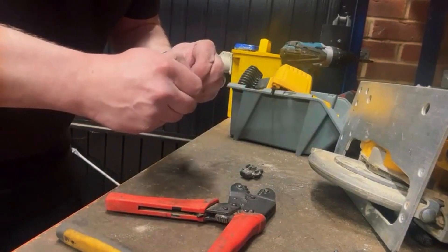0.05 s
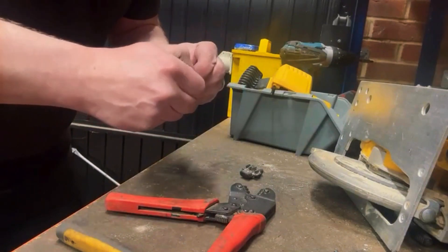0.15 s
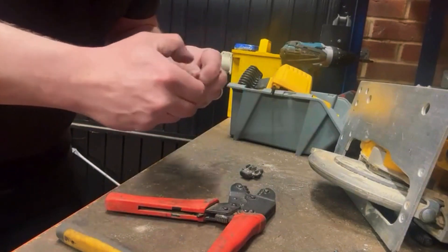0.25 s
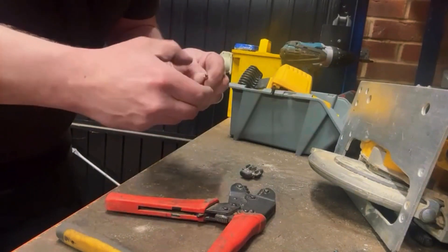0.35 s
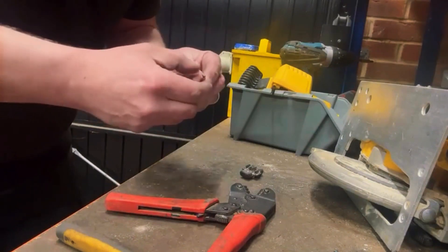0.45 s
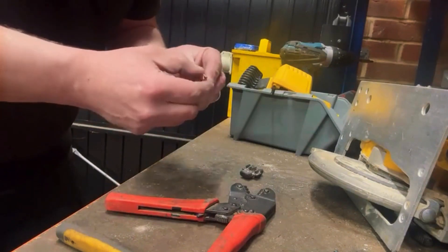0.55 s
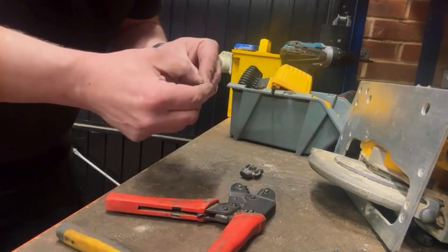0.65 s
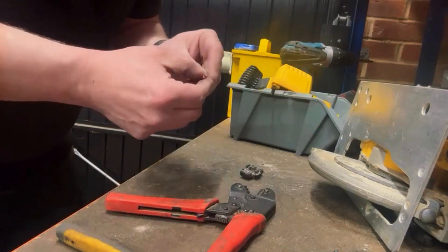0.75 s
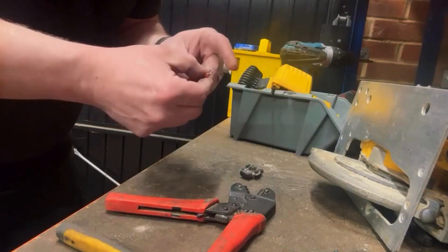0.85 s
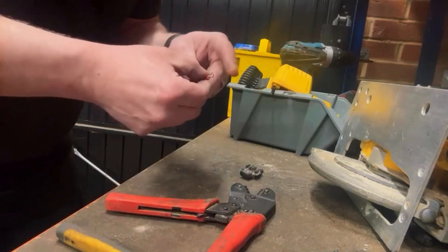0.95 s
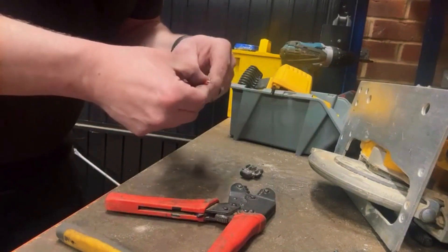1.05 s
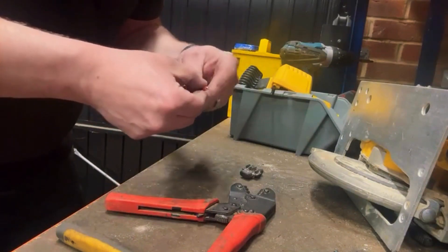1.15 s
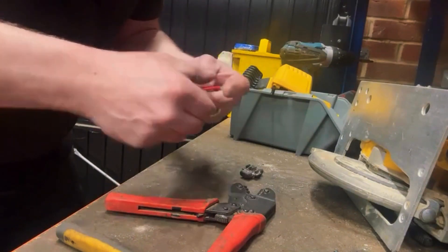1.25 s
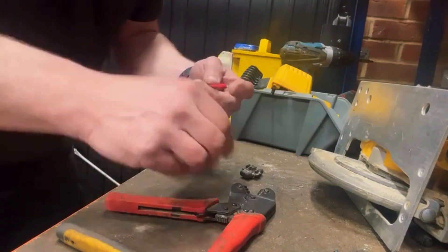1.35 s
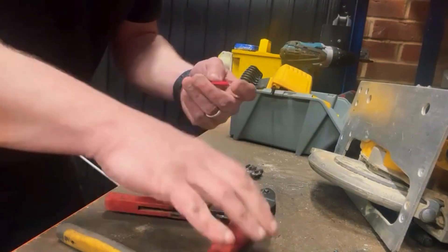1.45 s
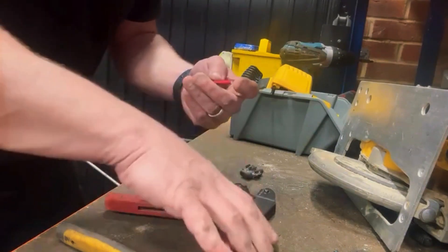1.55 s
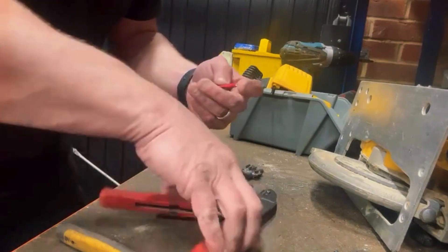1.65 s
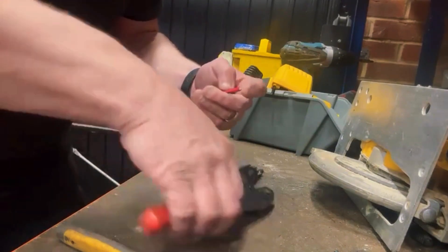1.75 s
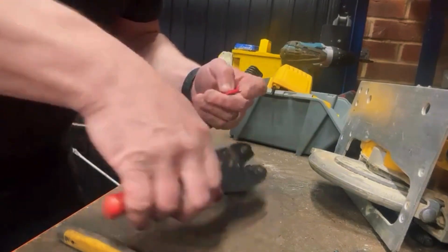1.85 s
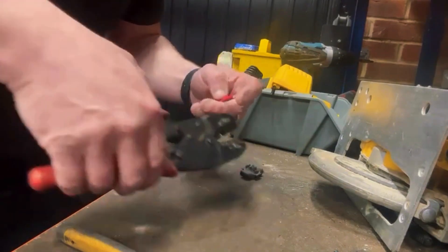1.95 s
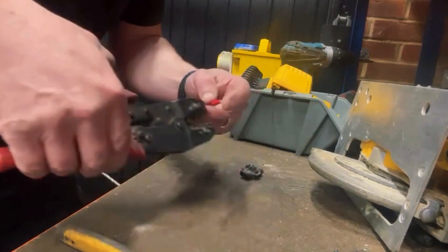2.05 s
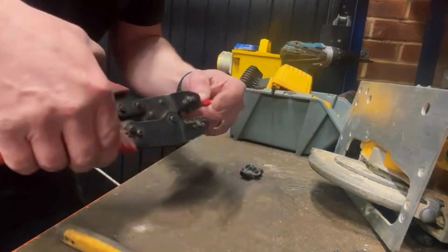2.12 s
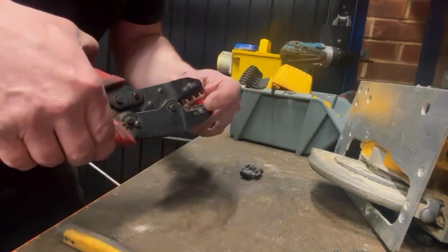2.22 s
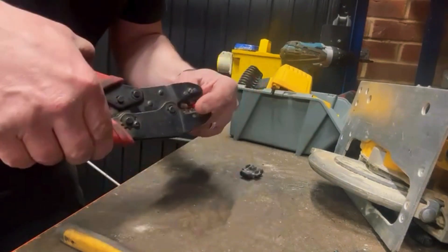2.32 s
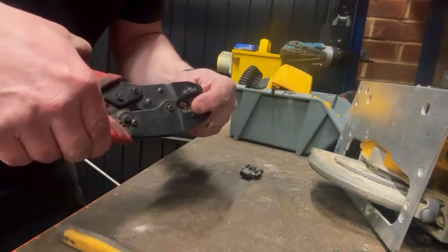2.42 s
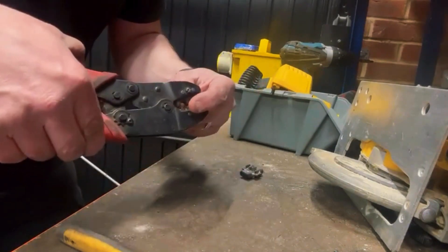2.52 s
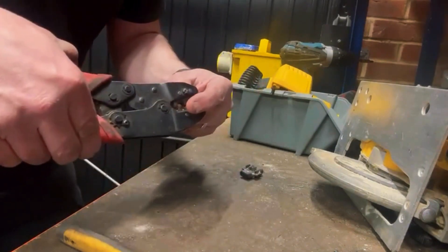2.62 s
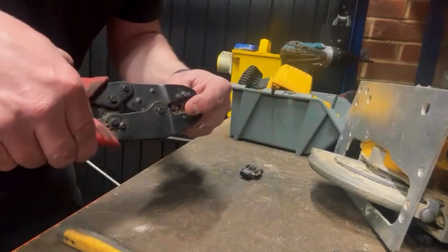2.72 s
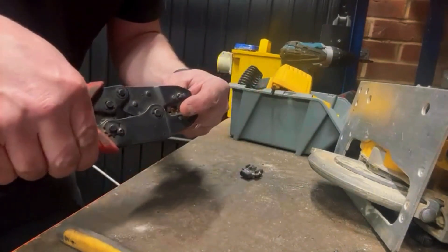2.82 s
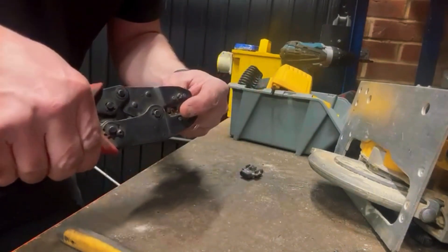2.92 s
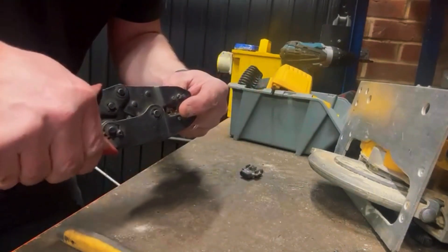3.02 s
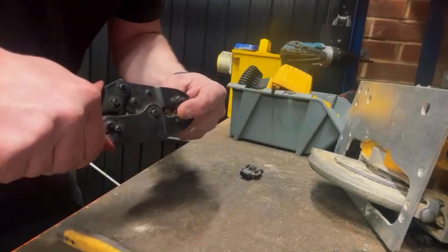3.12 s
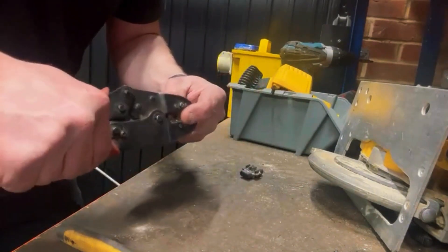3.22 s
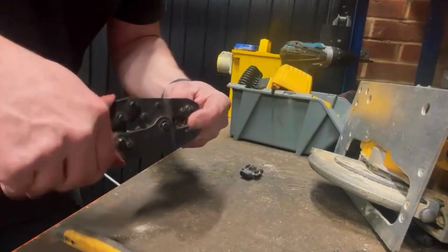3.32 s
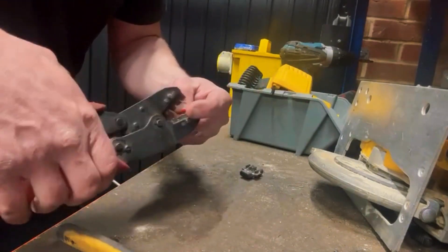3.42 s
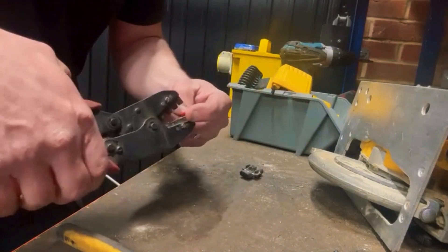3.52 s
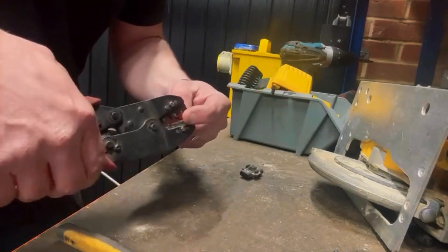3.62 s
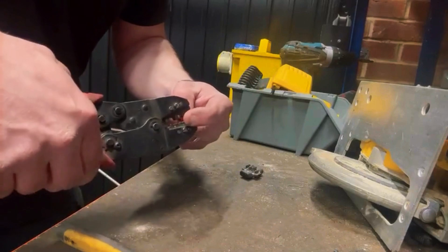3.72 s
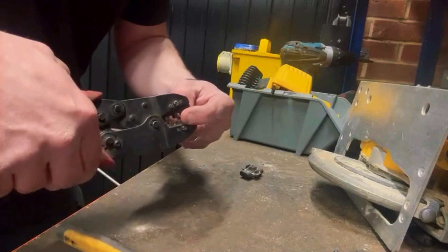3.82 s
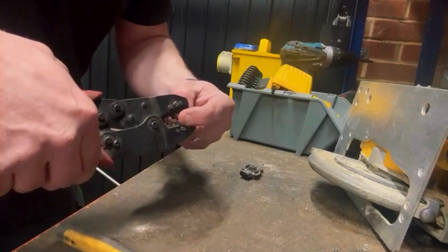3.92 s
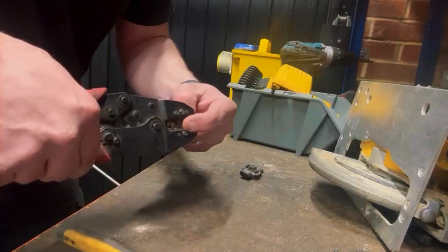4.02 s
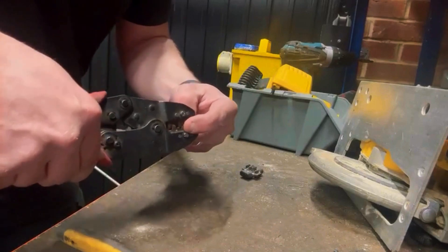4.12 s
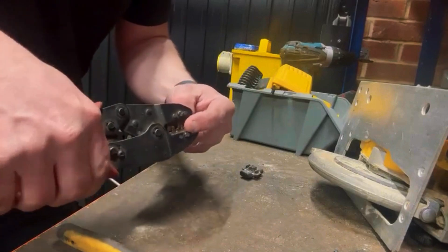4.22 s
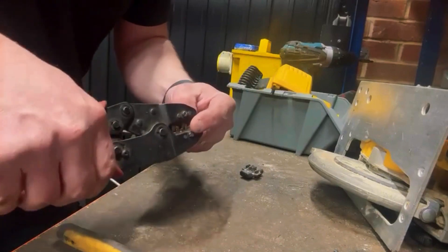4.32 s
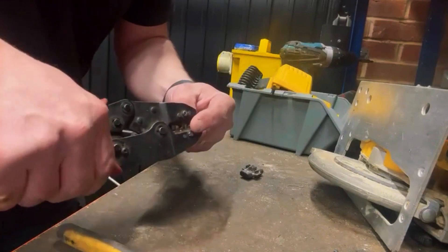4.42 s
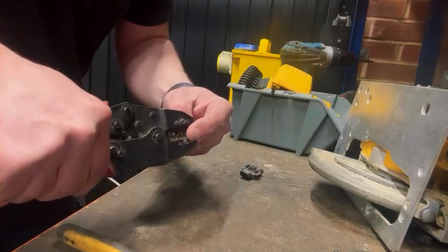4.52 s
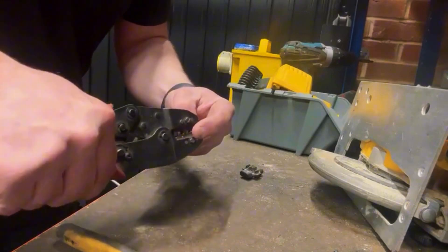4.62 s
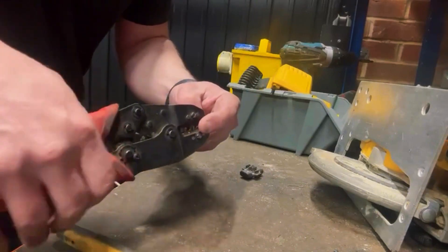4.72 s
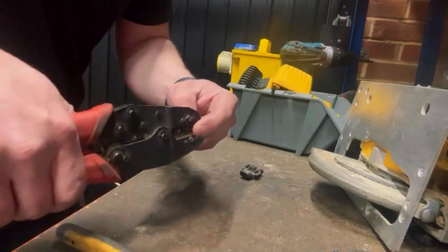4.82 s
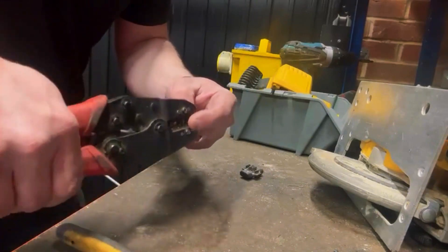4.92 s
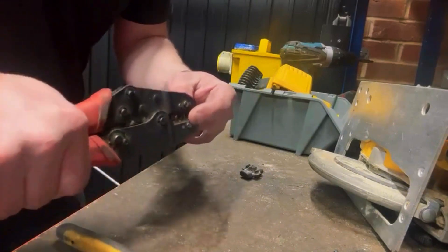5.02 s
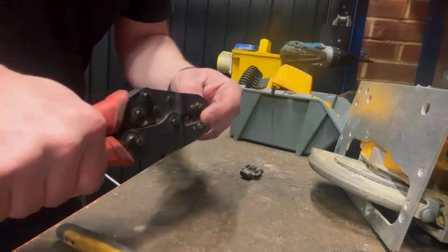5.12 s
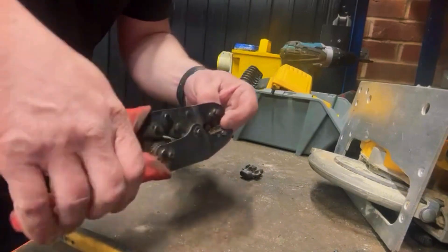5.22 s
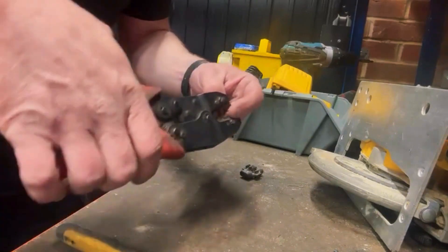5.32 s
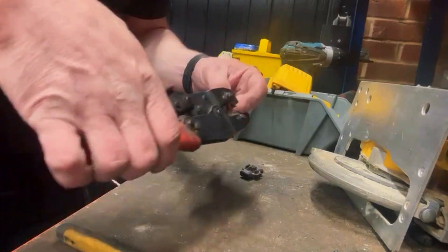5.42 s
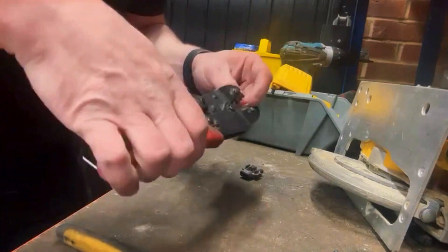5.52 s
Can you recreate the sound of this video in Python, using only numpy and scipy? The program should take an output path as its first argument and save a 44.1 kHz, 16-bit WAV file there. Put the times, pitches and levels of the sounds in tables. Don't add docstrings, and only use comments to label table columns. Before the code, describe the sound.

Close stereo pickup of a hand tool at a workbench, leaning right. Low rumble and soft hiss first, then a woody clatter and drag as the tool is lifted. Loud, dry steel ratchet clicks follow in irregular bursts with gaps between, including a rapid purring release, jaws shutting, faint spring ringing and a small skin rub on rubber at the end.

```python
import sys
import numpy as np
from scipy import signal
from scipy.fft import rfft, irfft, next_fast_len
from scipy.io import wavfile
from scipy.ndimage import uniform_filter1d

SR = 44100
rng = np.random.default_rng(int(sys.argv[2]) if len(sys.argv) > 2 else 0)


def transcribe(signal):
    frames = np.atleast_2d(signal).T
    limited = np.clip(frames, -1, 1)
    pcm = np.round(limited * 32767).astype(np.int16)
    wavfile.write(sys.argv[1], SR, pcm)


def volts_from_decibels(level):
    exponent = np.asarray(level, float) / 20
    return 10 ** exponent


N = 245004

# (time [s], peak [dB], treble over peak [dB], tooth tone [Hz], time for chatter to die by 60 dB [s])
TOOTH_SNAPS = [(2.595, -7.5, -14, 4084, .025), (2.6625, -7, -12, 4200, 0.019),
               (2.6981, -7.5, -13.5, 6780, 0.032), (2.8905, -15.5, -4, 5970, 0.023),
               (2.9645, -11, -6, 4370, .019), (3.0057, -13, -3, 4300, 0.039),
               (3.042, -10.5, -3, 4900, 0.046), (3.0778, -7, -7.5, 4120, .042),
               (3.9304, -8.5, -9.5, 3790, 0.032), (3.9465, -7.5, -11, 3920, .038),
               (3.9653, -4, -16.5, 4005, 0.03), (3.978, -9, -6, 3020, 0.021),
               (4.3175, -8.5, -11, 4510, 0.029), (4.4033, -13.5, -2, 6710, 0.027),
               (4.9408, -6, -6.5, 6850, 0.024), (5.1381, -19.5, -6.5, 5960, 0.05),
               (5.201, -7.5, -0.5, 6480, .018), (5.2172, -6.5, -5, 5670, .016),
               (5.271, -11.5, -7, 5840, 0.048), (5.298, -9, -8, 4300, .043),
               (5.3167, -12.5, -5.5, 2980, 0.062), (5.3402, -7.5, -10.5, 5940, 0.022),
               (5.4398, -5.5, -9.5, 6000, 0.031)]
# (time [s], peak [dB], treble over peak [dB], tone [Hz])
SLACK_TICKS = [(1.511, -45.5, -11, 3000), (1.6732, -34.5, -13, 5000), (1.7081, -34.5, -8, 5640),
               (2.161, -51.5, -41, 3020), (2.2375, -62, -28, 3280), (2.2948, -45, -4.5, 6500),
               (2.3424, -59, -7, 4160), (2.4538, -47.5, -17, 4500), (2.571, -49, -47, 5250),
               (2.6475, -35.5, 6.5, 4280), (3.2652, -30.5, -7.5, 5920), (3.314, -32.5, -18.5, 5310),
               (3.5923, -41, -14.5, 6320), (3.919, -37.5, -40, 3180), (4.2011, -35, -10.5, 4350),
               (4.2884, -45.5, -10.5, 5980), (4.6088, -46.5, -18, 3170), (4.6566, -52, 2, 5800),
               (5.5345, -27.5, -2, 3450)]
# (time [s], peak [dB], treble over peak [dB], clap over peak [dB])
JAW_CLAPS = [
    (3.0982, -16, -33, -10),
    (3.3023, -44, 0, -12),
    (3.991, -30, -1.5, -13.5),
    (4.9726, -7.5, -4.5, -23.5),
    (4.9794, -15.5, -1, -10),
    (5.0935, -33.5, -8, -5),
]
# (time [s], peak [dB], tooth tone [Hz])
RELEASE_RATTLE = [
    (3.3288, -7, 5650),
    (3.3348, -7.5, 3520),
    (3.342, -7, 4400),
    (3.3466, -7, 4220),
    (3.3543, -8, 3360),
    (3.3639, -11, 4000),
    (3.3714, -10, 4750),
    (3.375, -8, 4670),
    (3.3782, -25.5, 5300),
    (3.384, -23.5, 5300),
]
# (tone [Hz], level [dB], time to die by 60 dB [s])
STEEL_TONES = [(1456, -11, 0.078), (2136, -7, 0.054), (3170, -35.5, 0.046), (3386, 16, 0.0053),
               (3920, 11, 0.0098), (4120, -12, 0.14), (4426, -13.5, 0.1), (5050, -10.5, .05),
               (5300, -19.5, 0.065), (5824, -9.5, 0.013), (6000, -1.5, 0.084), (6357, 3, 0.058),
               (9030, -11, 0.025), (9675, -6.5, 0.024)]
# (pitch [Hz], level [dB])
JAW_COLOUR = [(100, -46.5), (250, -12), (450, -1), (800, -7), (1150, 3.5), (1600, 1), (2600, -1.5),
              (4000, -38)]
# (pitch [Hz], level [dB])
CRACK_COLOUR = [(300, -46), (800, -31), (1400, -16), (1750, -19.5), (2600, -16.5), (3200, -3.5),
                (3900, -4.5), (4700, -5.5), (6000, -3.5), (6700, -9), (7300, -16), (8200, -43)]
# (pitch [Hz], level [dB])
CRACK_TREBLE = [(6500, -27), (7600, -9), (8700, -2), (9600, 0), (10500, -2.5), (11500, -7.5),
                (13000, -27.5)]
# (plucked [s], damped [s], level [dB])
SPRING_PLUCKS = [
    (2.597, 3.08, -57),
    (3.98, 4.32, -60),
    (4.322, 4.75, -61),
    (4.99, 5.13, -62),
    (5.35, 5.55, -64),
]
# (tone [Hz], level [dB], time to die by 60 dB [s])
SPRING_TONES = [(730, -2.5, 2.2), (1520, 2, 0.72), (2200, 3, 0.48), (3000, -15.5, .3), (4300, 5.5, .3)]
# (time [s], level [dB], hardness as tilt [dB per octave], rise [s])
BENCH_KNOCKS = [
    (1.463, -24, -31, 0.039),
    (1.508, -11.5, 2.5, 0.0025),
    (1.514, -17, 0, 0.0065),
    (1.529, -15, -0.5, 0.0039),
    (1.552, -23, -10, 0.002),
    (1.68, -41, 2, 0.0061),
    (1.713, -26.5, 2, 0.0078),
    (1.745, -28, 0.5, 0.0008),
    (5.149, -44, -29, 0.0079),
    (4.975, -29.5, 1, 0.0048),
]
# (tone [Hz], level [dB], time to die by 60 dB [s])
BENCH_TONES = [(98, -4, .11), (135, -8, .06), (180, -5, .06), (250, -2, .07), (325, -8, .05), (398, 0, .06),
               (460, -7, .04), (610, -6, .04), (780, -3, .04), (880, -9, .035), (1090, -15, .035),
               (1400, -21, .03), (1900, -27, .03)]
# (time [s], pressure re full [dB])
DRAG_PRESSURE = [
    (1.452, -24),
    (1.467, -8),
    (1.55, -6.5),
    (1.6, 0),
    (1.723, -1.5),
    (1.774, -16),
    (1.874, -32.5),
    (2.0, -63),
]
# (pitch [Hz], level [dB])
SCUFF_COLOUR = [(250, -48), (550, 12), (800, 4), (1100, -4), (1800, -7.5), (2600, -17), (4000, -56)]
# (pitch [Hz], level [dB per Hz])
SCRAPE_COLOUR = [(1290, -24.5), (2200, -5), (3040, -7.5), (4650, 2), (6390, 1.5), (7590, -8), (8160, -8.5),
                 (11000, -6.5), (11800, -10.5), (12300, -71.5), (16000, -89), (22000, -120)]
# (start [s], held [s], level [dB])
PALM_SLIPS = [
    (1.87, 0.023, -71.5),
    (3.62, .03, -69.5),
    (3.905, .015, -64.5),
    (4.664, 0.095, -58),
    (4.851, 0.015, -62.5),
    (5.535, .03, -39.5),
]
# (pitch [Hz], time to die by 60 dB [s])
SHED_ECHO = [(200, 0.36), (1000, 0.32), (3000, 0.28), (6000, 0.29), (11000, 0.29)]
# (pitch [Hz], left over right [dB])
NEAR_LEFT = [(60, -9.5), (350, -5), (800, -4), (2100, -10), (3400, -10.5), (4400, -18.5), (6200, -11),
             (7500, 2)]
# (pitch [Hz], level [dB per Hz])
HUSH_COLOUR = [(20, -18), (62, 0), (125, -6), (250, -14), (400, -11), (630, -26), (1000, -20), (1300, -25),
               (1650, -34), (3200, -41), (6300, -44), (10000, -40), (11300, -42), (12200, -65)]
# (pitch [Hz], left over right [dB])
HUSH_BALANCE = [(60, -2.0), (170, -4.5), (500, -2.5), (1430, -4.0), (4120, -2.0), (11800, -0.5)]
# (pitch [Hz], likeness [0 to 1])
HUSH_LIKENESS = [(40, 1), (100, 0.06), (300, 0.024), (2000, 0.43)]
# (time [s], width [s], swell [dB])
FAR_RUMBLE = [
    (.72, 0.15, 11),
    (1.15, 0.055, 17),
    (1.95, .3, 12),
    (3.05, 0.45, 9),
    (5.1, 0.6, 6.5),
]
# (time [s], width [s], swell [dB])
AIR_RISE = (2.5, 0.18, 1.3)
# (pitch [Hz], level [dB])
MICROPHONE_EDGE = [(6700, 0), (7250, -7), (7800, 0), (11500, 0), (12100, -17), (12800, -27), (15500, -30),
                   (16500, -60)]

LEAD_S = 0.02
SNAP_CLAP_DB = -42
TICK_CLAP_DB, TICK_CHATTER_S = -21, 0.049
CLAP_HZ, CLAP_CHATTER_S = 3270, 0.03
RELEASE_TREBLE_DB, RELEASE_CLAP_DB, RELEASE_CHATTER_S = -7.5, -38, 0.025
LUMPS_DB = 2.2
SPRING_FADE = 0.5
BOARDS_DB, SCUFF_DB, SCRAPE_DB = -34.5, -42.5, -50
BOARDS_FOLLOW, SCUFF_FOLLOWS, SCRAPE_FOLLOWS = 1.5, 1.1, 0.99
SLIP_RISE_DB_PER_S, SLIP_FADE_DB_PER_S = 900, 450
HUSH_DB, RUMBLE_BASE_DB, AIR_BASE_DB = -62, -6.5, -2.5
DUCK_DB, DUCK_FROM_DB, DUCK_LAG_S = 3, -37, 0.5
MONO_HZ = 7650


def read(points, hz):
    f, value = np.transpose(points)
    return np.interp(np.log(hz + 1), np.log(f + 1), value)


def evened(x):
    return x / np.sqrt(np.mean(x ** 2) + 1e-20)


def peaked(x):
    return x / abs(x).max()


def shaped(x, points):
    size = x.shape[-1]
    n = next_fast_len(size)
    gain = volts_from_decibels(read(points, np.fft.rfftfreq(n, 1 / SR)))
    return irfft(rfft(x, n) * gain, n)[..., :size]


def add(mix, s, sound):
    part = mix[..., round(s * SR):][..., :sound.shape[-1]]
    part += sound[..., :part.shape[-1]]


def ring(modes, size, spread_db=0., tilt_db=0.):
    hz, db, t60 = np.transpose(modes)[:, :, None]
    chance = rng.standard_normal((2, len(modes), 1))
    t = np.arange(size) / SR
    level_db = db + spread_db * chance[0] + tilt_db * np.log2(hz / 300) - 60 * t / t60
    tones = np.sign(chance[1]) * np.sin(2 * np.pi * hz * t)
    return (volts_from_decibels(level_db) * tones).sum(0)


def snap(db, treble_db, clap_db, loud_hz, chatter):
    t = np.arange(5000) / SR - LEAD_S - 0.0011
    noise, picks = rng.standard_normal((3, len(t))), rng.random((3, len(t)))
    hits = noise * (picks < 0.12)
    hits = 0.9 * hits[0] + 0.8 * hits[1:]
    creep = volts_from_decibels(-23.5 + 1600 * t) + volts_from_decibels(54000 * t)
    dying = volts_from_decibels(-60 * t / max(chatter, 0.003))
    blows = hits * np.where(t < 0, creep, dying) * volts_from_decibels(-9)
    land = np.argmin(abs(t))
    blows[[0, 1], [land - 2, land]] += [-1, 1]
    lumps = [(hz, LUMPS_DB * rng.standard_normal()) for hz in np.arange(1000, 12000, 300)]
    blows = shaped(blows, lumps)

    plates = ring(STEEL_TONES, size=len(t), spread_db=3)
    plates = signal.fftconvolve(blows, plates[None])[:, :len(t)]
    plates = peaked(shaped(plates, [(500, -56.5), (1200, -9.0)]))
    steel = peaked(shaped(blows, CRACK_COLOUR)) + volts_from_decibels(-13.0) * plates
    tooth_tone = [(loud_hz * 0.75, 0), (loud_hz, 5), (loud_hz * 1.3, 0)]
    steel = peaked(shaped(steel, tooth_tone))

    clap = (noise[0] + 0.5 * noise[1:]) * (t > 0) * volts_from_decibels(-60 * t / 0.094)
    jaws = volts_from_decibels(clap_db) * peaked(shaped(clap, JAW_COLOUR))
    treble = volts_from_decibels(treble_db - 0.5) * peaked(shaped(blows, CRACK_TREBLE))
    fade_out = np.minimum((t[-1] - t) / 0.03, 1)
    return volts_from_decibels(db + 5) * (steel + jaws + treble) * fade_out


def spring(plucked, damped, db):
    tone = ring(SPRING_TONES, size=round((damped - plucked) * SR))
    left = 1 - np.arange(len(tone)) / len(tone)
    return volts_from_decibels(db) * tone * np.clip(left / SPRING_FADE, 0, 1)


def pliers():
    landings = [(s, db, treble_db, SNAP_CLAP_DB, hz, chatter) for s, db, treble_db, hz, chatter in TOOTH_SNAPS]
    landings += [(s, db, treble_db, TICK_CLAP_DB, hz, TICK_CHATTER_S) for s, db, treble_db, hz in SLACK_TICKS]
    landings += [(*row, CLAP_HZ, CLAP_CHATTER_S) for row in JAW_CLAPS]
    landings += [(s, db, RELEASE_TREBLE_DB, RELEASE_CLAP_DB, hz, RELEASE_CHATTER_S)
                 for s, db, hz in RELEASE_RATTLE]
    out = np.zeros((2, N))
    for s, *landing in landings:
        add(out, s - LEAD_S, snap(*landing))
    for plucked, damped, db in SPRING_PLUCKS:
        add(out, plucked, spring(plucked, damped, db))
    return out


def grain(per_s, spread_db):
    size = volts_from_decibels(spread_db * np.minimum(rng.exponential(1, N), 5))
    size = size * (rng.random(N) < per_s / SR)
    return size * (0.55 * rng.standard_normal(N) + 0.87 * rng.standard_normal((2, N)))


def pressed(db, follows):
    pressure_db = np.interp(np.arange(N) / SR, *np.transpose(DRAG_PRESSURE), -100, -100)
    return volts_from_decibels(db + follows * pressure_db)


def bench():
    t, wood = np.arange(8000) / SR, np.zeros(N)
    for s, db, tilt_db, rise in BENCH_KNOCKS:
        attack = np.sin(np.minimum(t / rise, 1) * np.pi / 2) ** 2
        knock = ring(BENCH_TONES, size=len(t), tilt_db=tilt_db) * attack
        add(wood, s, volts_from_decibels(db) * peaked(knock))

    boards = ring(BENCH_TONES, size=len(t), tilt_db=-4.0) * (1 - np.exp(-t / 0.0005))
    shaken = signal.oaconvolve(grain(per_s=640, spread_db=1.0)[0], boards)[:N]
    wood = wood + pressed(BOARDS_DB, BOARDS_FOLLOW) * evened(shaken)

    scuff = evened(shaped(grain(per_s=3300, spread_db=-1.5)[0], SCUFF_COLOUR))
    wood = wood + pressed(SCUFF_DB, SCUFF_FOLLOWS) * scuff

    scrape = evened(shaped(grain(per_s=14000, spread_db=1.5), SCRAPE_COLOUR))
    both = np.array([np.roll(wood, 30), wood])
    return both + pressed(SCRAPE_DB, SCRAPE_FOLLOWS) * scrape


def slips():
    rub = evened(shaped(grain(per_s=18000, spread_db=-3.0), SCRAPE_COLOUR))
    t, gain = np.arange(N) / SR, np.zeros(N)
    for s, held, db in PALM_SLIPS:
        rise_db = SLIP_RISE_DB_PER_S * np.maximum(s - t, 0)
        fade_db = SLIP_FADE_DB_PER_S * np.maximum(t - s - held, 0)
        gain += volts_from_decibels(db - rise_db - fade_db)
    return rub * gain


def shed(x):
    taps = np.zeros((2, SR // 2))
    at = np.arange(120, SR // 2 - 20, 20)
    at = at + rng.integers(0, 20, (2, len(at)))
    np.put_along_axis(taps, at, rng.choice([-1., 1.], at.shape), 1)
    hz, t, z = signal.stft(taps, SR, nperseg=128)
    dying = volts_from_decibels(-60 * t / read(SHED_ECHO, hz)[:, None])
    tail = signal.istft(z * dying, SR, nperseg=128)[1]
    return signal.fftconvolve(x, tail / np.linalg.norm(tail[0]), axes=1)[:, :N]


def ducking(near):
    busy = 1. * (uniform_filter1d(near[1] ** 2, size=400) > volts_from_decibels(2 * DUCK_FROM_DB))
    keep = np.exp(-1 / (DUCK_LAG_S * SR))
    return -DUCK_DB * signal.lfilter([(1 - keep) ** 2], [1, -2 * keep, keep ** 2], busy)


def hush(duck_db):
    frames, hz = N // 256 + 5, np.fft.rfftfreq(1024, 1 / SR)
    a, b, c, d, patches = rng.standard_normal((frames, 513, 5)).T
    patches = evened(uniform_filter1d(uniform_filter1d(patches, 8, 0), 12, 1))
    t = np.arange(frames) * 256 / SR

    rumble_db = RUMBLE_BASE_DB + sum(db * np.exp(-((t - s) / width) ** 2) for s, width, db in FAR_RUMBLE)
    rise_s, rise_width, rise_db = AIR_RISE
    air_db = AIR_BASE_DB + rise_db * np.exp(-((t - rise_s) / rise_width) ** 2)
    air_db = air_db + np.interp(t * SR, np.arange(N), duck_db)
    low = 1 / (1 + (hz[:, None] / 200) ** 4)
    level_db = low * rumble_db + (1 - low) * air_db

    same = np.clip(read(HUSH_LIKENESS, hz), -1, 1)[:, None]
    right = a + 1j * b
    left = same * right + np.sqrt(1 - same ** 2) * (c + 1j * d)
    left = left * volts_from_decibels(read(HUSH_BALANCE, hz))[:, None]
    z = np.array([left, right]) * volts_from_decibels(read(HUSH_COLOUR, hz)[:, None] + 3.9 * patches + level_db)
    air = signal.istft(z, nperseg=1024, noverlap=768)[1][:, :N]
    return volts_from_decibels(HUSH_DB + 1) * evened(air)


def scene():
    near = pliers() + bench() + slips()
    near = near + volts_from_decibels(-11.5) * shed(near)
    heard = np.array([shaped(near[0], NEAR_LEFT), near[1]])
    return heard + hush(ducking(near))


def top_cut(x):
    return signal.sosfilt(signal.butter(12, 12450, fs=SR, output="sos"), x)


def record(dry):
    treble = signal.firwin(255, MONO_HZ, pass_zero=False, fs=SR)
    apart = signal.oaconvolve(dry - dry.mean(0), treble[None], "same")
    x = shaped(dry - 0.65 * apart, MICROPHONE_EDGE)
    squeezed = x / (1 + abs(x / 0.88) ** 4) ** 0.25
    return top_cut(squeezed)


dry = scene()
out = record(dry)
transcribe(out)
```